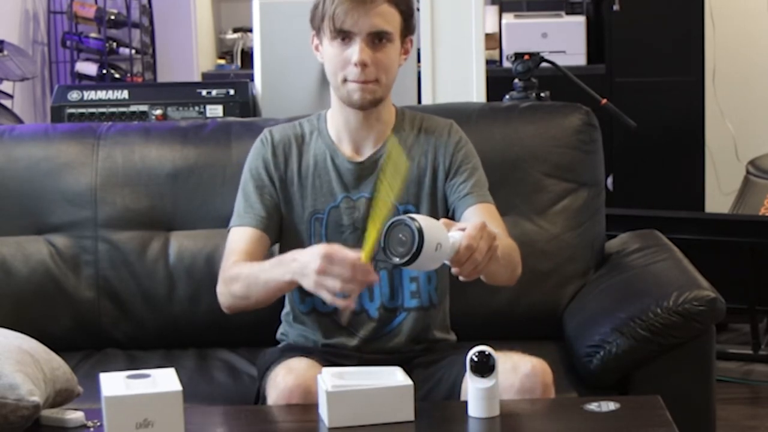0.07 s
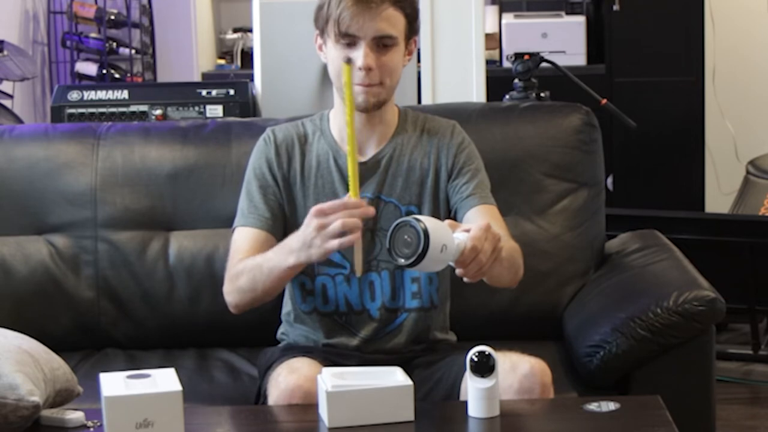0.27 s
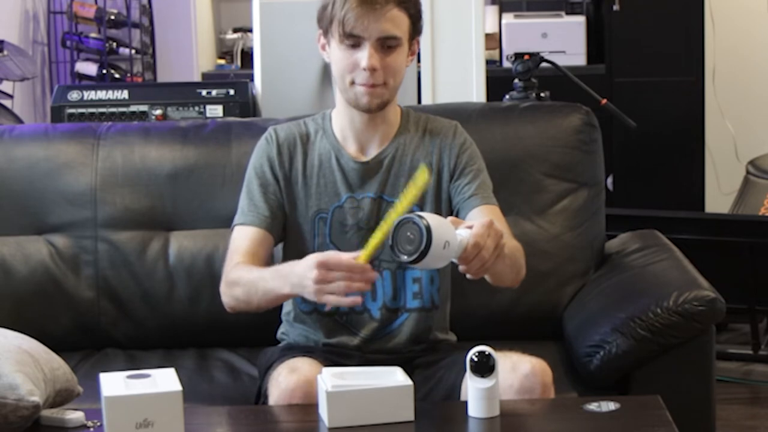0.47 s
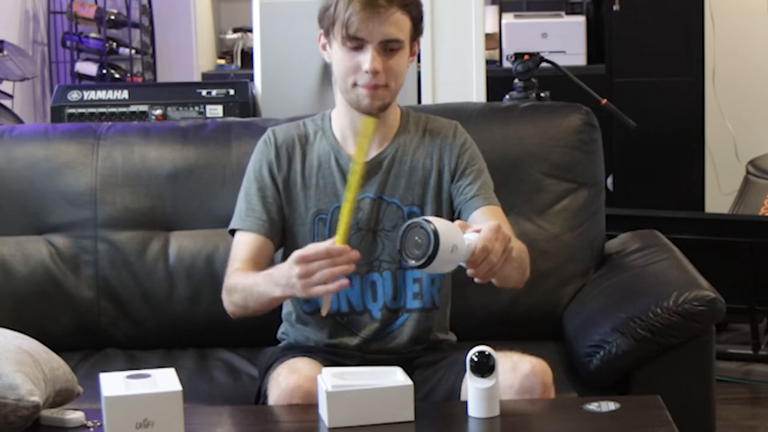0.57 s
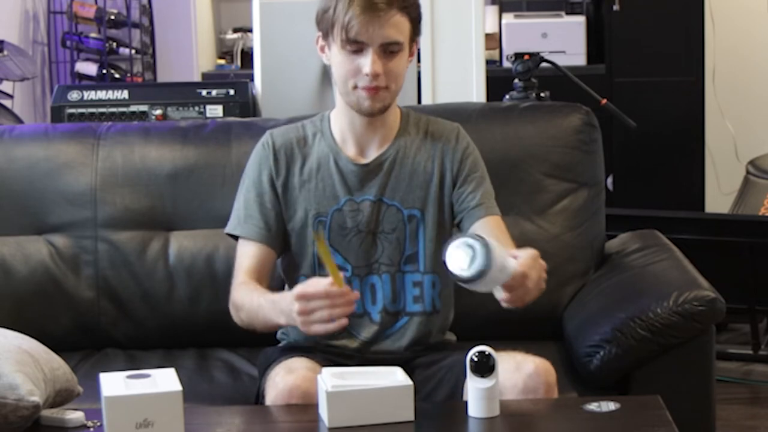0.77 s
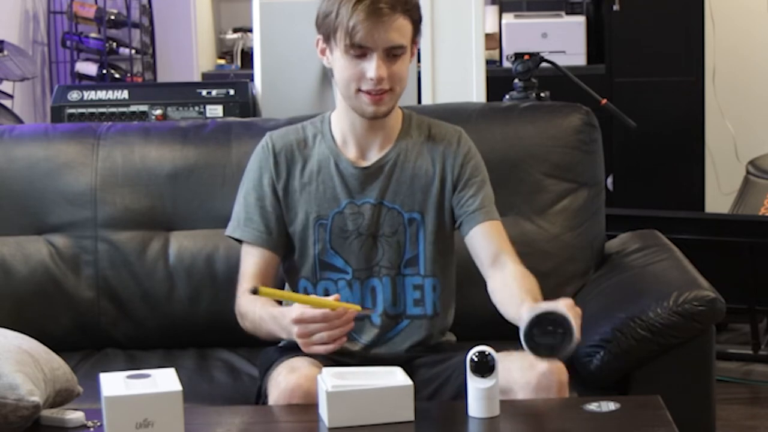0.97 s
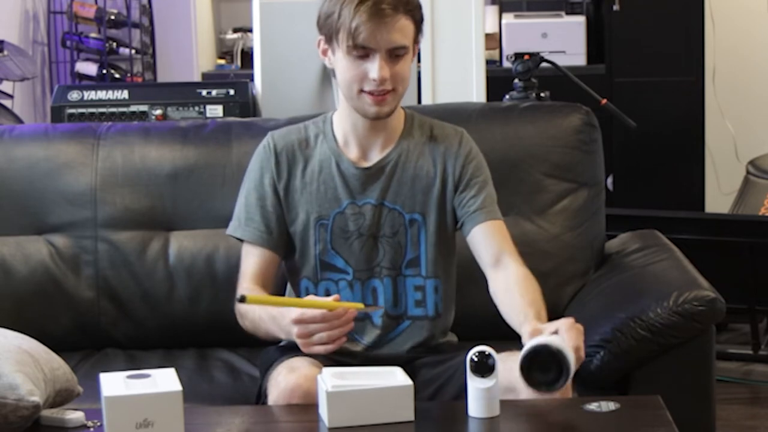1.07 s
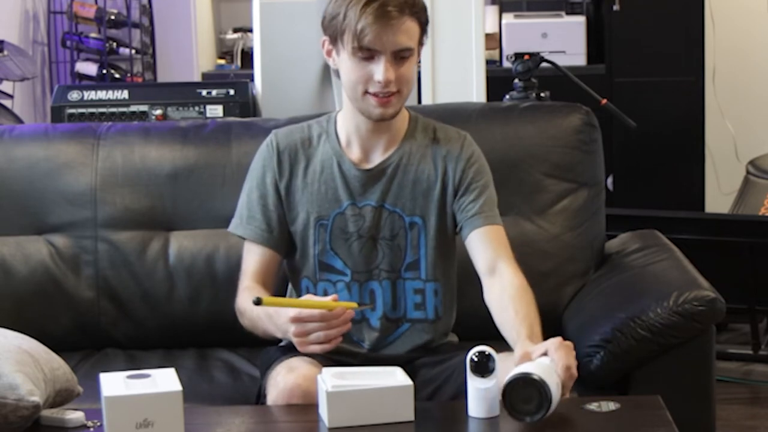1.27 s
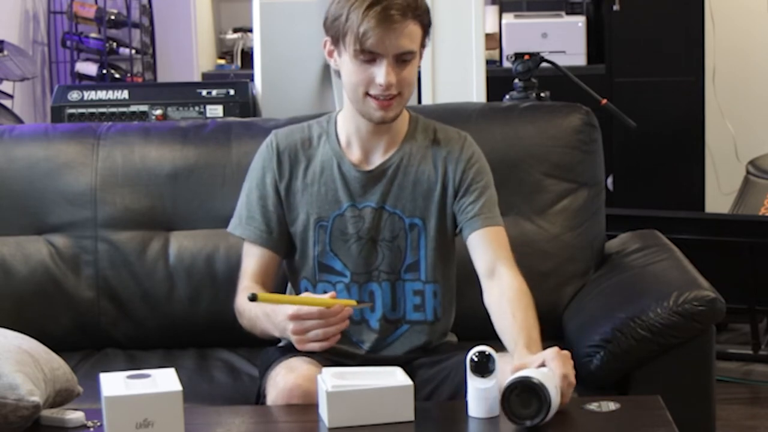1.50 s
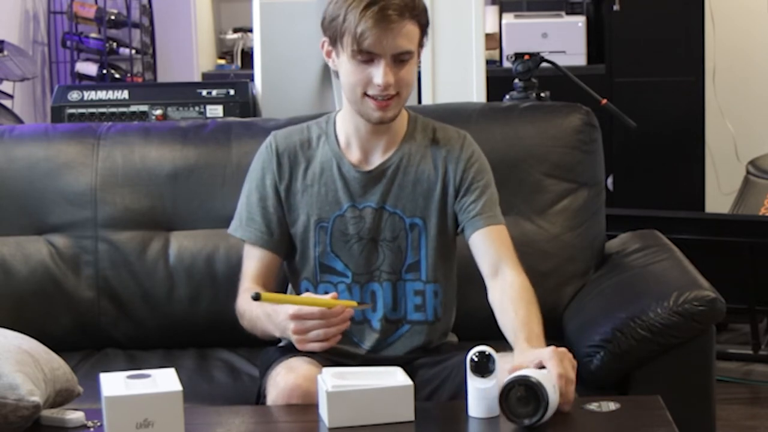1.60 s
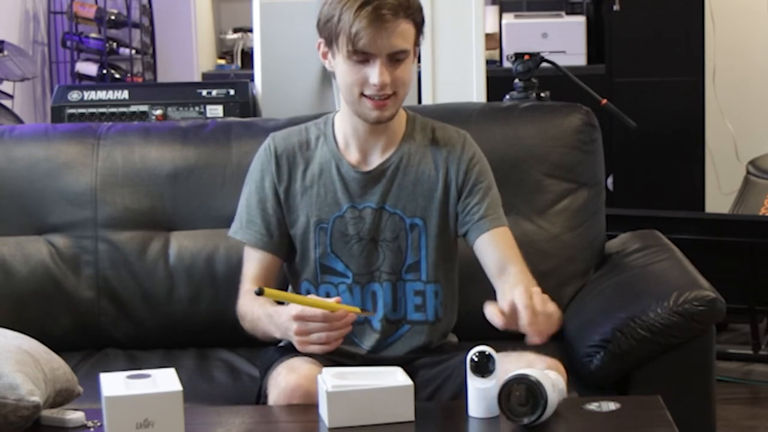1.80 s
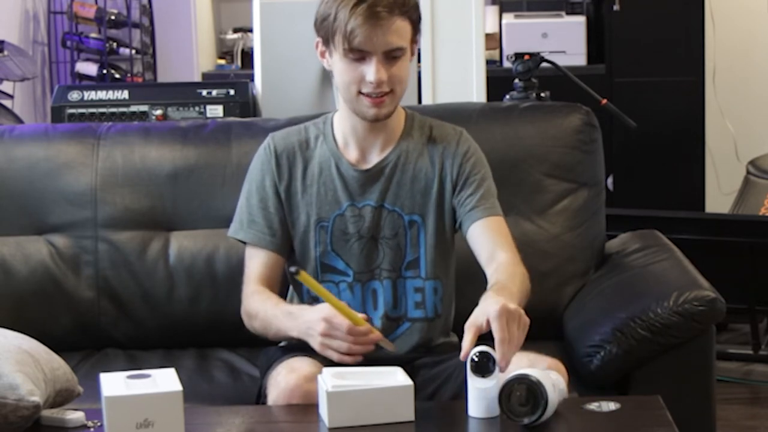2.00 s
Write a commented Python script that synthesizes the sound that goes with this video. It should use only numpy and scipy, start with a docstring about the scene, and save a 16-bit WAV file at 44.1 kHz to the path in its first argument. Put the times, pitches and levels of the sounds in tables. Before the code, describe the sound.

A wooden drumstick taps a metal camera housing twice with bright, ringing knocks. The housing is then set on a wooden table with a knock and a duller thud, rattling slightly. Heard a few metres away in a living room.

```python
"""Drumstick on a metal camera housing

A wooden drumstick taps a hand-held metal housing twice; an earlier tap is still ringing out.
The housing is set down on a wooden table with a knock and rocks over with a second, duller thud,
its loose parts rattling. Heard from a few metres away in a live living room, the taps are mostly room."""
import sys
import numpy as np
from scipy import signal
from scipy.fft import rfft, irfft, next_fast_len
from scipy.io import wavfile
from scipy.ndimage import uniform_filter1d

SR = 44100
rng = np.random.default_rng(int(sys.argv[2]) if len(sys.argv) > 2 else 0)


def generate_wav(signal):
    """Clip the signal to [-1, 1] and save it as 16-bit WAV at the path in sys.argv[1]."""
    frames = np.transpose(np.atleast_2d(signal))
    scaled = np.clip(frames, -1, 1) * 32767
    pcm = np.round(scaled).astype(np.int16)
    wavfile.write(sys.argv[1], SR, pcm)


N = 90404
LEAD_S = .5   # holds the tap that lands before time zero
SIZE = next_fast_len(2 * N)
T = np.arange(SIZE) / SR
HZ = np.maximum(np.arange(SIZE // 2 + 1) * SR / SIZE, 1)


def from_db(db):
    """Decibels to gain."""
    return 10 ** (np.asarray(db) / 20)


def gain_curve(points):
    """Gain per bin from (freq_hz, level_db) points, on a log-frequency axis."""
    freq_hz, level_db = np.transpose(points)
    return from_db(np.interp(np.log(HZ), np.log(freq_hz), level_db))


def decay(t60_s):
    """Envelope that falls 60 dB in t60_s."""
    return from_db(-np.minimum(60 * T / t60_s, 300))


def at_time(start_s):
    """Spectrum of a unit impulse at start_s."""
    return np.exp(-2j * np.pi * HZ * (start_s + LEAD_S))


def high_cut(hz):
    """Two-pole low-pass."""
    s = 1j * HZ / hz
    return 1 / (1 + np.sqrt(2) * s + s * s)


def low_cut(hz):
    """Two-pole high-pass."""
    return high_cut(hz) * (1j * HZ / hz) ** 2


def shortest_pulse(gain):
    """Minimum-phase spectrum with this gain per bin."""
    cepstrum = irfft(np.log(gain + 1e-9), SIZE)
    cepstrum[1:SIZE // 2] *= 2
    cepstrum[SIZE // 2 + 1:] = 0
    return np.exp(rfft(cepstrum))


def bending(dispersion_s):
    """High bending waves outrun low ones, so a blow arrives as a short falling chirp."""
    return np.exp(-4j * np.pi * dispersion_s * (np.sqrt(1000 * HZ) - HZ / 8))


# stick taps: start_s, level_db, place (0-1 along the housing), crack_db
STICK_TAPS = [(-0.175, -3, .05, 4), (0.1733, -0.5, .1, 2), (0.5202, 0.5, 0.93, 1.5)]
# stick and housing modes: pitch_hz, peak_at_place_0_db, peak_at_place_1_db, width_hz
STICK_HOUSING_MODES = [(458, 3, 4.5, 13), (1230, 7, 4.5, 90), (2150, 25.5, 25, 42), (2357.7, 10, 24, 23),
                       (3223, 16, 14.5, 89), (3675, -2.5, 14, 75), (4495, 23.5, 20.5, 63),
                       (5266.7, 3, 17.5, 41), (5890, 15, 19, 130), (6890, -9, 9.5, 240),
                       (8946.3, 7, 2, 150), (10550, 3, 4, 170), (12180, 1.5, 1, 170),
                       (13800, -15, -10.5, 220)]
# contact crack: freq_hz, level_db
CRACK_SPECTRUM = [(100, -25.5), (340, -16.5), (680, -7.5), (900, -7.5), (1500, -0.5), (2700, -0.5),
                  (3900, -1.5), (5000, 5.5), (6500, 0), (7400, -2.5), (8200, -10), (11500, -15),
                  (14000, -18), (16500, -37)]


def stick_taps(reflections):
    """Wood strikes metal: a crack, a bright tick and modes weighted by where the stick lands."""
    direct_gain, room_gain = from_db(2.5), from_db(11.5)
    tick = from_db(5) * np.abs(low_cut(hz=5000) * high_cut(hz=10100))
    taps = 0
    for start_s, level_db, place, crack_db in STICK_TAPS:
        power = (from_db(crack_db) * gain_curve(CRACK_SPECTRUM)) ** 2
        for pitch_hz, place_0_db, place_1_db, width_hz in STICK_HOUSING_MODES:
            peak = from_db(place_0_db + (place_1_db - place_0_db) * place)
            detuning_hz = HZ - pitch_hz ** 2 / HZ
            resonance = peak ** 2 / (1 + (detuning_hz / width_hz) ** 2)
            skirt_loss = 1 + (detuning_hz / (0.34 * pitch_hz)) ** 2
            power += resonance / skirt_loss
        direct = shortest_pulse(np.sqrt(direct_gain ** 2 * power + tick ** 2))
        reflected = room_gain * shortest_pulse(np.sqrt(power)) * reflections
        taps += from_db(level_db) * at_time(start_s) * (direct + reflected)
    return taps * bending(dispersion_s=0.0022)


# room decay: freq_hz, t60_s
ROOM_DECAY = [(80, 0.37), (320, 0.42), (550, 0.57), (1400, .56), (2200, .68), (4500, 0.67), (7000, 0.51),
              (10000, 0.43), (15000, .4)]
# treble loss of the reflections: freq_hz, gain_db
AIR_LOSS = [(11000, -0.5), (14000, -5), (16000, -13.5)]


def room_reflections():
    """Scatter off player, sofa and table, then diffuse reflections that build and die band by band."""
    near_s, near_db, gap_s, build_s, early_s, early_db = 0.0004, -6, .006, 0.013, 0.024, -15
    white = rfft(rng.standard_normal(SIZE))
    log_centres = np.log([hz for hz, _ in ROOM_DECAY])
    tail = 0
    for selector, (_, t60_s) in zip(np.eye(len(log_centres)), ROOM_DECAY):
        band = np.interp(np.log(HZ), log_centres, selector)
        tail += irfft(white * band, SIZE) * decay(t60_s)
    near = from_db(near_db) * (T > near_s)
    diffuse = np.clip((T - gap_s) / build_s, 0, 1)
    early_lift = 1 + from_db(early_db) * np.exp(-(T / early_s) ** 2)
    response = rfft(tail * np.maximum(near, diffuse) * early_lift)
    colour = np.sqrt(uniform_filter1d(np.abs(response) ** 2, size=300))
    return response * shortest_pulse(gain_curve(AIR_LOSS) / colour)


# room rumble: freq_hz, relative_density_db
RUMBLE_SPECTRUM = [(20, -1), (55, 1.5), (120, -0.5), (200, -4.5), (500, -13), (1500, -21.5), (4000, -27.5),
                   (10000, -35), (13000, -40.5), (16000, -53.5)]


def room_tone():
    """Steady low rumble with a faint mains hum."""
    rumble_db, hum_db, hum_hz = -59, -63.5, 120
    rumble = irfft(rfft(rng.standard_normal(SIZE)) * gain_curve(RUMBLE_SPECTRUM), SIZE)[:N]
    hum = np.sin(2 * np.pi * hum_hz * T[:N])
    return from_db(rumble_db) * rumble / rumble.std() + from_db(hum_db) * hum


# grip ticks: start_s, level_db, pitch_hz
GRIP_TICKS = [(0.851, -16, 604), (1.137, -37.5, 7200)]


def grip_ticks(reflections):
    """Tiny damped ticks as the hands shift their grip."""
    q = 3
    ticks = 0
    for start_s, level_db, pitch_hz in GRIP_TICKS:
        resonance = 1 / (1 + 1j * q * (HZ / pitch_hz - pitch_hz / HZ))
        ticks += from_db(level_db) * at_time(start_s) * resonance
    return ticks * (1 + reflections)


# housing meets table: start_s, level_db, high_cut_hz, low_cut_hz, rattle_db
TABLE_CONTACTS = [(1.4260, 1, 2290, 370.4, -27), (1.4344, 8.5, 333, 137, -42),
                  (1.4685, -6.5, 1700, 1270, -54), (1.48, 4.5, 237.6, 49.6, -38),
                  (1.7115, -6, 897.4, 812.3, -37), (1.7182, -24, 1905, 1184, -54),
                  (1.7276, 6.5, 213, 129.6, -46), (1.7637, 2.5, 139, 81, -56.5),
                  (1.797, -17, 149.1, 90, -72.5)]
# table-top knock: freq_hz, level_db
KNOCK_SPECTRUM = [(30, -15), (70, 2.5), (150, -5), (260, 1), (550, 4.5), (750, -6), (950, -1), (1600, -7.5),
                  (2600, -11), (3300, -18.5), (4500, -31), (7000, -21), (10000, -33), (16000, -27)]
# table modes: pitch_hz, level_db, t60_s
WOOD_MODES = [(40.7, -43.5, 0.41), (72, -34, 0.27), (101.4, -28.5, 0.29), (161.4, -41, 0.47),
              (226, -56, 0.38), (254.4, -27, 0.16), (326.8, -27, 0.15), (438, -34, 0.47), (496, -21, 0.44),
              (613, -28, 0.44)]


def table_knocks(reflections):
    """Contacts send bending waves through the top and ring it; soft ones lack treble, light ones bass."""
    knock_db, room_db = 21, -4.5
    force = sum(from_db(level_db) * at_time(start_s) * high_cut(high_cut_hz) * low_cut(low_cut_hz)
                for start_s, level_db, high_cut_hz, low_cut_hz, _ in TABLE_CONTACTS)
    knock = from_db(knock_db) * shortest_pulse(gain_curve(KNOCK_SPECTRUM)) * bending(dispersion_s=.0012)
    ring = sum((-1) ** k * from_db(level_db) * np.sin(2 * np.pi * pitch_hz * T) * decay(t60_s)
               for k, (pitch_hz, level_db, t60_s) in enumerate(WOOD_MODES))
    return force * (knock * (1 + from_db(room_db) * reflections) + rfft(ring))


# loose parts in the housing: freq_hz, level_db
RATTLE_SPECTRUM = [(500, -34), (2500, 17), (5000, 7.5), (9000, -2.5), (12000, -9), (16000, -36)]


def housing_rattle(reflections):
    """Each table contact shakes the loose parts, which take a moment to start chattering."""
    gain_db, direct_db, rise_s = -14.5, -3, 0.0015
    envelope = (1 - np.exp(-T / rise_s)) * decay(t60_s=0.066)
    chatter = sum(from_db(rattle_db) * at_time(start_s) * rfft(rng.standard_normal(SIZE) * envelope)
                  for start_s, *_, rattle_db in TABLE_CONTACTS)
    rattle = from_db(gain_db) * shortest_pulse(gain_curve(RATTLE_SPECTRUM)) * chatter
    return rattle * (from_db(direct_db) + reflections)


def scene():
    """Taps, ticks, knocks and rattle in one room, over its tone."""
    reflections = room_reflections()
    spectrum = stick_taps(reflections) + grip_ticks(reflections)
    spectrum += table_knocks(reflections) + housing_rattle(reflections)
    lead = int(LEAD_S * SR)
    return (irfft(spectrum, SIZE)[lead:lead + N] + room_tone())[None]


def record(dry):
    """Soft peak limiting, then a steep low-pass."""
    peak_limit, cutoff_hz = 0.46, 16000
    rounded = peak_limit * np.tanh(dry / peak_limit)
    return signal.sosfilt(signal.ellip(10, .1, 80, cutoff_hz, fs=SR, output="sos"), rounded)


dry = scene()
out = record(dry)
generate_wav(out)
```